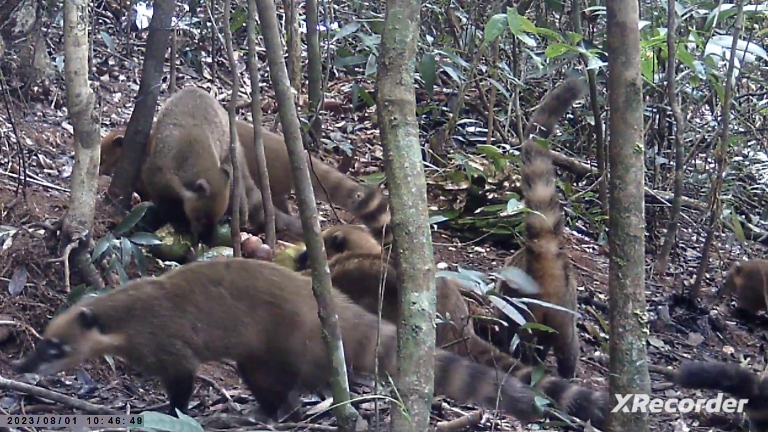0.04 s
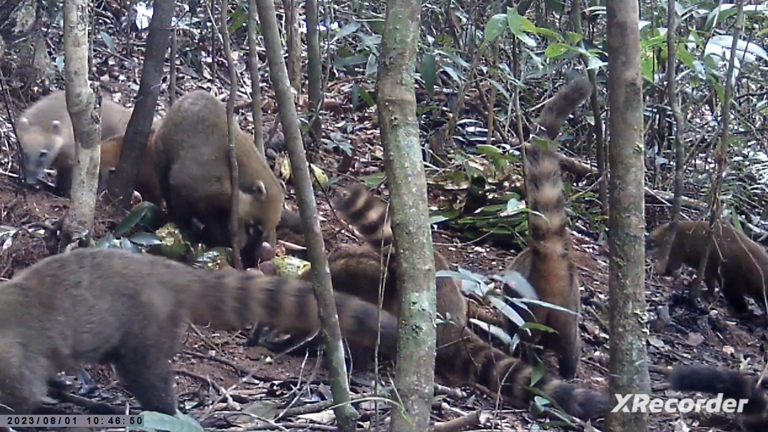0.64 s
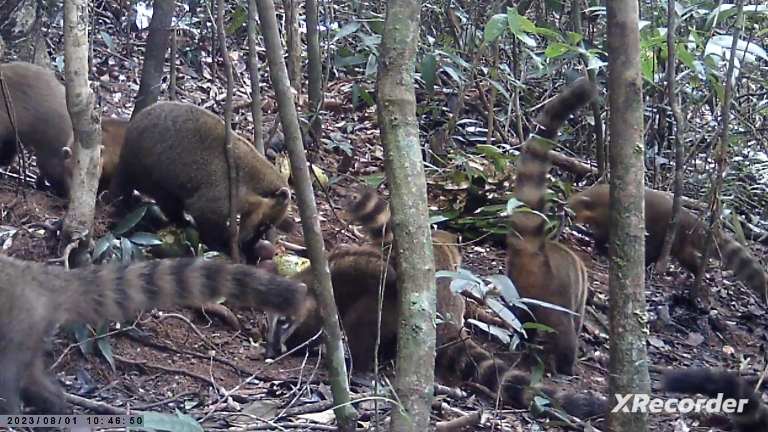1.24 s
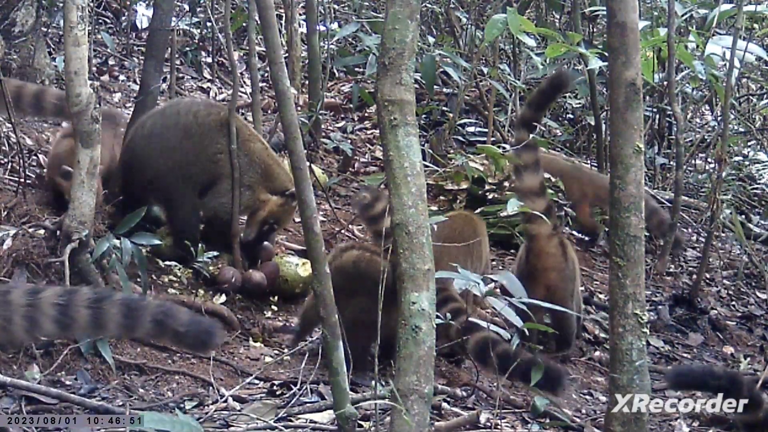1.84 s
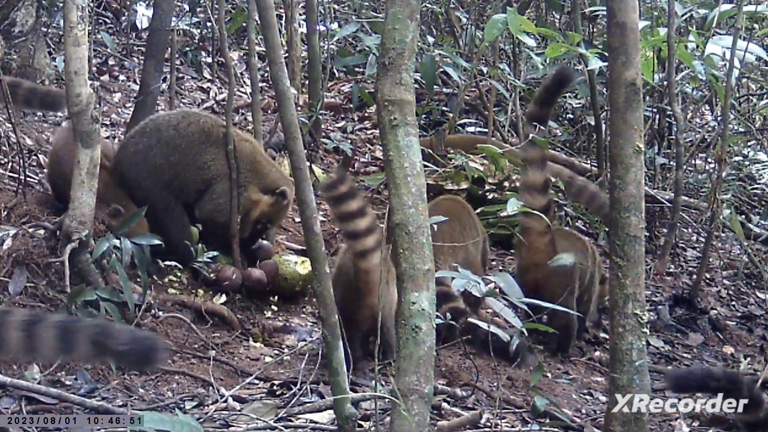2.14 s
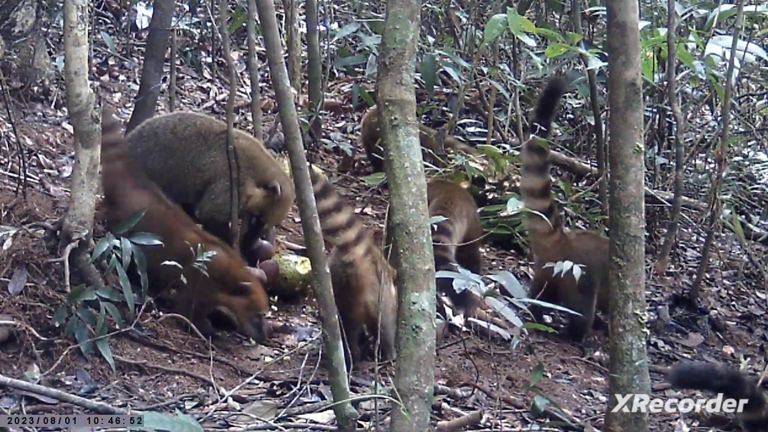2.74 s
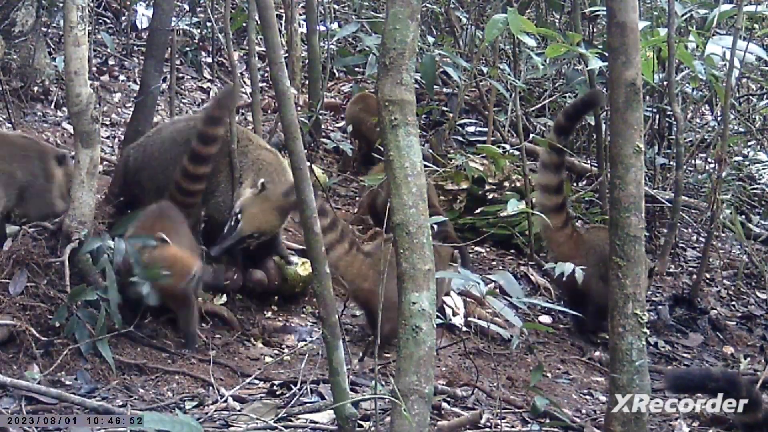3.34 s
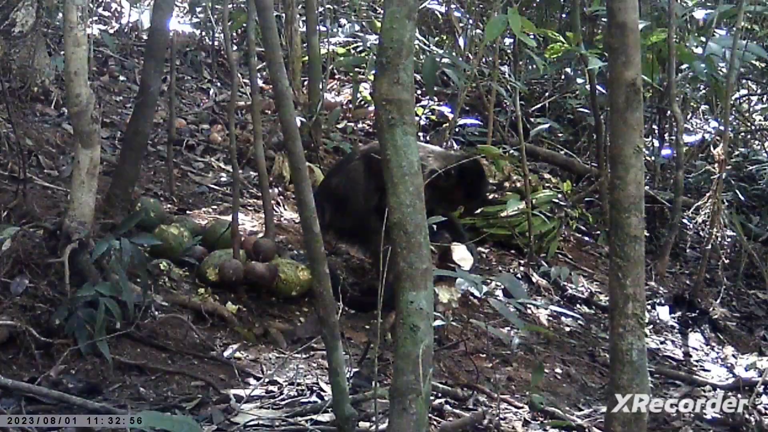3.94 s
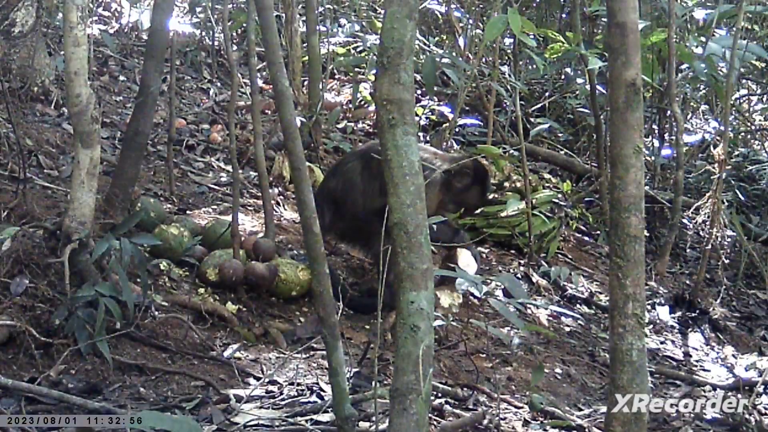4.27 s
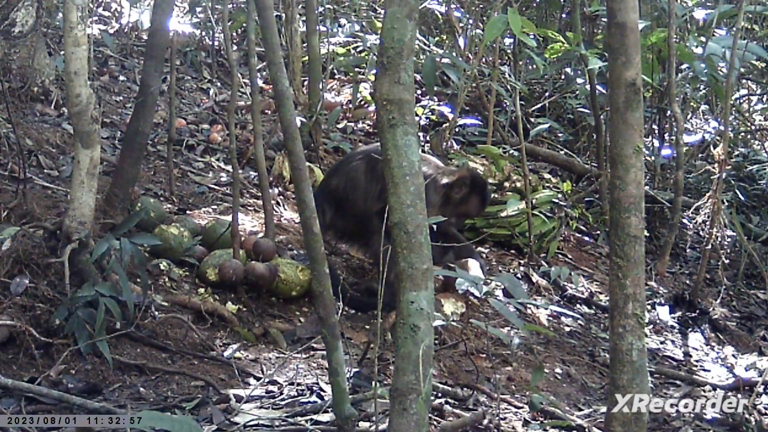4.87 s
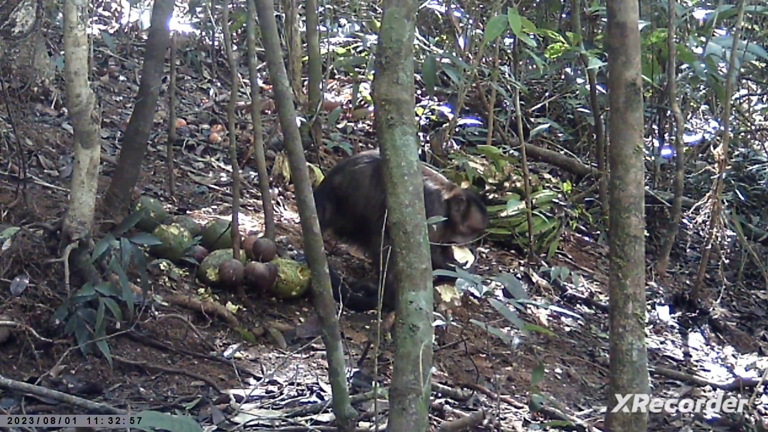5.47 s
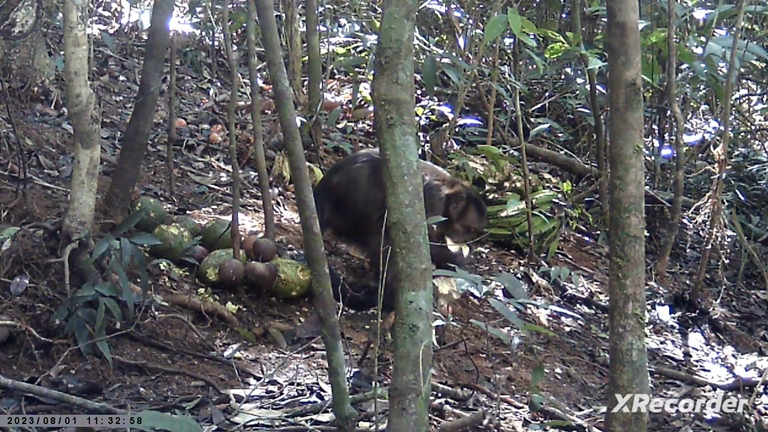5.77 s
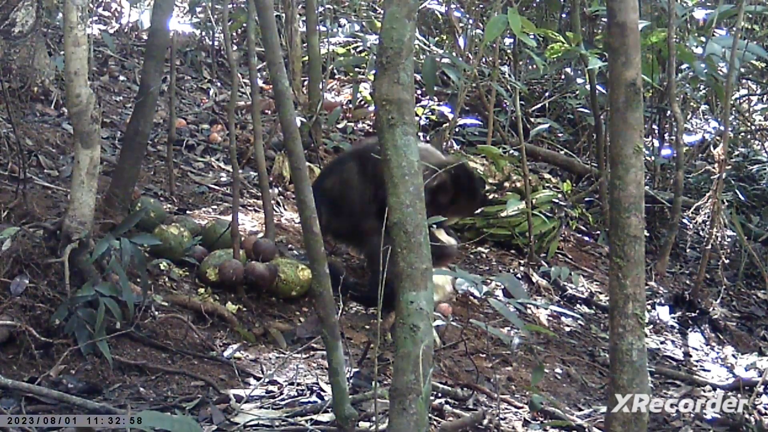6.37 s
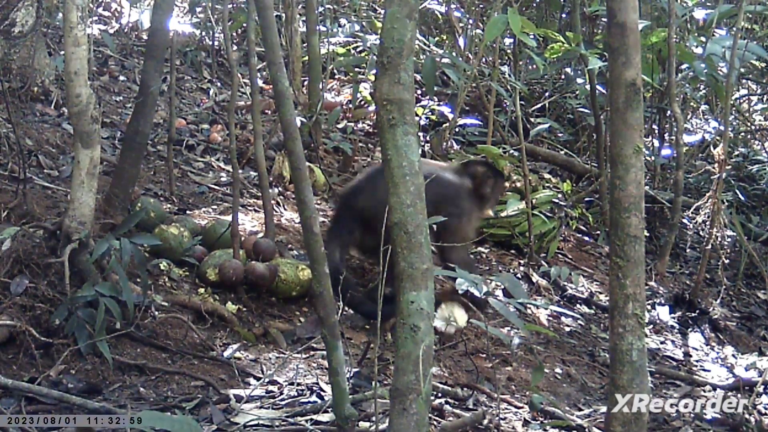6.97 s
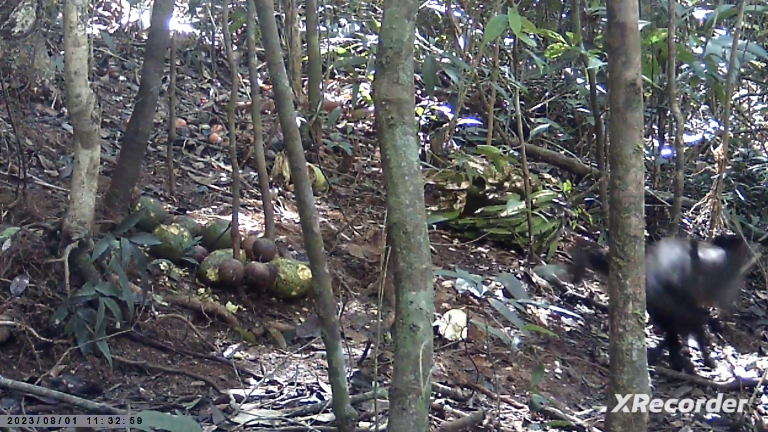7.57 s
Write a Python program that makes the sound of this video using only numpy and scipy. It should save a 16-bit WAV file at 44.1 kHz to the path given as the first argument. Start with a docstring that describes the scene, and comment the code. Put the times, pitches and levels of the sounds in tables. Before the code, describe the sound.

Close, high animal chirps and a wavering squeal amid leaf rustle, then a short gap and quiet biting and tearing of fruit rind.

```python
"""Two sharp chirps, a thin peep and a long wavering squeal sound over rustling dry leaves: coatis squabble over
fallen fruit and crack its rind. After a short silence a monkey tears at a husk, and two faint whistles sound.
The calls are tones from slightly unsteady vocal folds. Leaves, twigs and husk break in tiny bursts of noise.
Tree trunks scatter it all back, over a soft hiss and rumble."""
import sys
import numpy as np
from scipy import signal
from scipy.fft import rfft, irfft
from scipy.io import wavfile
from scipy.ndimage import uniform_filter1d

SR = 44100
rng = np.random.default_rng(int(sys.argv[2]) if len(sys.argv) > 2 else 0)


def transcribe(u):
    """Save the signal u as a 16-bit wav file named by the first command-line argument.

    u: samples, shape (n,) or (channels, n), limited to [-1, 1]; the rate is SR.
    q: integer samples, one column per channel.
    """
    v = np.clip(np.atleast_2d(u).T, -1, 1)
    q = np.round(v * 32767).astype(np.int16)
    wavfile.write(sys.argv[1], SR, q)


N = 340011
TIME = np.arange(N) / SR
SILENCE_START_S, SILENCE_END_S = 3.248, 3.976
TREBLE_LIMIT_HZ = 11050

# Coati chirps: t/s, length/s, first f/Hz, top f/Hz, last f/Hz, peak level/dB, loudest point/share of
# length, start level/dB and end level/dB (both relative to the peak), forest tail level/dB
CHIRPS = [(0.0597, .039, 5304, 6320, 4950, -16.5, 0.18, -5, -12, -14.5),
          (0.12, 0.033, 3800, 4020, 3850, -57, 0.37, -5, 0, -13),
          (2.502, 0.044, 3450, 4396, 3850, -26, 0.4, -10, -10.5, -19),
          (2.746, .06, 9100, 9520, 9250, -53, .5, 0, -8, -10)]
# Paws pressing into the leaves: t/s, level/dB, brightness of the first snap/dB per octave
STEPS = [(0.5294, -47.5, 2), (0.5794, -47.5, 4), (0.619, -48, 0), (0.6794, -57, 0), (0.865, -48.5, -2),
         (0.9702, -50.5, -2), (1.0148, -49, -5), (1.108, -50.5, -3), (1.3236, -47.5, -3), (1.5155, -45, 1),
         (1.62, -54, 3), (1.737, -48, -2), (2.0038, -45.5, 1), (2.0836, -47, 2), (2.1494, -49, 0),
         (2.2004, -46.5, 0), (2.442, -45, -1)]
# Tone colour of dry leaves: f/Hz, level/dB
LEAF_COLOUR = [(100, 0.5), (400, -8.5), (1500, -5), (2500, -5), (4500, 0.5), (6500, 0), (8000, -10),
               (11000, -15)]


def squeal(weak_hz=6562, width_hz=85.7, dip_db=-10.5):
    """A long coati call that thins each time it glides through one weak pitch."""
    # The squeal's four swells: t/s, f/Hz, level/dB
    swells = [(2.887, 4480, -30), (2.899, 6230, -18), (2.911, 6800, -14), (2.922, 6660, -17.5),
              (2.943, 6150, -18), (2.970, 7070, -12.5), (2.984, 7160, -11.5), (3.008, 6260, -19.5),
              (3.043, 6000, -17), (3.059, 6260, -25), (3.083, 6080, -12), (3.097, 5150, -19),
              (3.104, 3900, -35)]
    times, hz, _ = np.transpose(swells)
    closeness = np.exp(-((np.interp(TIME, times, hz) - weak_hz) / width_hz) ** 2)
    return coati(swells) * amp(dip_db * closeness)


def chirps():
    """Short calls from coatis at different distances, each with its own amount of echo."""
    return sum(forest(coati(arch(*shape)), near_db=-10.5, far_db=tail_db, near_s=.13, far_s=.44)
               for *shape, tail_db in CHIRPS)


def lingering_chirp(level_db=-3, age_s=0.2, pitch_ratio=0.91):
    """The wood still rings with a slightly lower chirp from just before the start."""
    out = np.zeros(N)
    chirp = coati(arch(*CHIRPS[0][:-1]) * [1, pitch_ratio, 1])
    add(out, 0, forest(chirp, near_db=-10, far_db=-8)[round(age_s * SR):])
    return amp(level_db) * out


def coati(rows):
    """A coati's voice: a tone plus an overtone at twice the pitch, whose strength the mouth sets; near 7 kHz
    the overtone is almost as loud as the tone."""
    # How strongly the mouth passes the overtone: f/Hz, level/dB
    mouth = [(6000, -17), (7000, -1.5), (7900, -27), (9500, -43)]
    out = np.zeros(N)
    start, pitch, phase, level = vocal_folds(rows, jitter=0.0045, shimmer_db=0.96, flutter_hz=300)
    overtone = amp(level_at(mouth, 2 * pitch)) * np.sin(2 * phase)
    add(out, start, level * (np.sin(phase) + overtone))
    return out


def vocal_folds(rows, jitter, shimmer_db, flutter_hz):
    """The folds vibrate unevenly: jitter shakes the pitch and shimmer shakes the loudness."""
    times, hz, db = np.transpose(rows)
    t = np.arange(times[0], times[-1], 1 / SR)
    pitch = uniform_filter1d(np.interp(t, times, hz), size=200)
    pitch *= 1 + jitter * wobble(len(t), flutter_hz)
    phase = 2 * np.pi * np.cumsum(pitch) / SR
    to_edge_s = np.minimum(t - times[0], times[-1] - t)
    fade = np.sin(np.pi / 2 * np.minimum(to_edge_s / .002, 1)) ** 2
    shaky_db = np.interp(t, times, db) + shimmer_db * wobble(len(t), flutter_hz)
    level = np.sqrt(2) * fade * uniform_filter1d(amp(shaky_db), size=80)
    return times[0], pitch, phase, level


def arch(start, length, first_hz, top_hz, last_hz, db, loudest, start_db, end_db):
    """A short call whose pitch rises, then falls ever faster, as rows of t/s, f/Hz, level/dB."""
    top, drop = .53, .3  # shares of the call: where the pitch peaks, how long the level takes to drop
    progress = np.linspace(0, 1, 41)
    rise = first_hz + (top_hz - first_hz) * np.sin(np.pi / 2 * progress / top) ** 2
    fall = top_hz + (last_hz - top_hz) * abs((progress - top) / (1 - top)) ** 1.5
    level = db + np.interp(progress, [0, loudest, loudest + drop], [start_db, 0, end_db])
    return np.transpose([start + length * progress, np.where(progress < top, rise, fall), level])


def rasp(call, level_db=-17, loud_db=-14, lumps_db=3.5):
    """A low, lumpy rasp rides on the squeal and grows quickly with its strength."""
    # Tone colour of the rasp: f/Hz, level/dB
    rasp_colour = [(20, -4.5), (70, 5), (150, -8), (300, -10), (700, -13), (1350, -35), (3600, -33.5),
                   (5000, -23), (8000, -55)]
    quick_level = np.sqrt(abs(uniform_filter1d(call ** 2, size=500)))
    slow_level = np.sqrt(abs(uniform_filter1d(call ** 2, size=3000)))
    noise = rng.standard_normal(N) * amp(lumps_db * wobble(N, 150))
    lumps = unit(colour(noise, rasp_colour))
    return amp(level_db) * quick_level * np.tanh(slow_level / amp(loud_db)) * lumps


def husk(level_db=1, ring_hz=2010, ring_width_hz=320, ring_db=10.3):
    """Rind tears in dry cracks, first under the coatis' teeth, later under the monkey's; each bite briefly
    rings the hollow fruit."""
    # Rind cracking, by the coatis near 3.1 s and by the monkey after the silence: t/s, level/dB, decay/s,
    # brightness/dB per octave
    cracks = [(3.101, -39, .02, 4.5), (3.118, -40.5, .04, 0.5), (5.8925, -37.5, 0.014, 1.5),
              (5.898, -54.5, 0.085, 18), (6.304, -52, .05, 9), (6.3075, -36.5, 0.02, -3.5),
              (6.3115, -31.5, 0.016, 1.5), (6.319, -44.5, 0.14, 6.5), (7.155, -53.5, 0.027, -2)]
    # Teeth biting in: same columns
    bites = [(6.106, -51.5, 0.018, 1.5), (6.1425, -47, 0.0092, 6), (6.178, -59, .02, 4),
             (6.1865, -42.5, 0.0094, -1.5), (6.193, -48.5, 0.022, 3), (6.2365, -45, .012, 0)]
    # Tone colour of the husk: f/Hz, level/dB
    husk_colour = [(100, -24.5), (1000, -26), (1400, -9), (2100, -3.5), (2900, -7.5), (3600, -9),
                   (4700, -6.5), (5600, -6), (7000, -14), (11000, -28)]
    biting = breaks(bites, husk_colour, grain_db=9, snap=3)
    ring = amp(ring_db) * resonate(biting, ring_hz, ring_width_hz)
    tearing = breaks(cracks, husk_colour, grain_db=4, snap=4.7)
    return amp(level_db) * (tearing + biting + ring)


def forest_floor(step_snap_db=-8.5, step_snap_s=.028):
    """Leaves and twigs snap under paws and snouts, once at each step; four soft low thumps also sound."""
    # Leaves and twigs snapping: t/s, level/dB, decay/s, brightness/dB per octave
    snaps = [(.076, -40.5, 0.05, 4.5), (.546, -50, 0.032, 5), (1.557, -58, 0.027, -3),
             (1.738, -56, 0.026, 0), (2.003, -43, 0.015, 4), (2.054, -53, .015, 12), (2.215, -48, .03, 2.5),
             (2.531, -36.5, 0.052, 2), (6.644, -58, .08, 4), (7.519, -58, 0.067, 8)]
    # Small twigs ticking: same columns
    ticks = [(4.123, -49.5, 0.038, -7), (5.549, -60, .03, -3.5)]
    # Soft low thumps, one under each loud chirp, one before the squeal, one as sound resumes: same columns
    thuds = [(.063, -45.5, 0.16, 7.5), (2.533, -51.5, .08, -0.5), (2.79, -55.5, 0.097, -2),
             (3.979, -48, 0.08, 3.5)]
    # Tone colour of twigs: f/Hz, level/dB
    twig_colour = [(300, -12), (2600, -28), (3400, 2), (4100, -1), (4900, -9), (7000, -19), (11000, -27)]
    # Tone colour of the thumps: f/Hz, level/dB
    thump_colour = [(30, -3), (100, -1), (200, -9.5), (340, -5), (550, -18.5), (1500, -31.5), (6000, -49.5)]
    steps = [(start, db + step_snap_db, step_snap_s, tilt_db) for start, db, tilt_db in STEPS]
    leaves = breaks(snaps, LEAF_COLOUR, grain_db=4, snap=0.92) + breaks(steps, LEAF_COLOUR, grain_db=4.5)
    twigs = breaks(ticks, twig_colour, grain_db=0)
    thumps = breaks(thuds, thump_colour, grain_db=0)
    return leaves + twigs + thumps + shuffle()


def breaks(rows, body_colour, grain_db, snap=0):
    """Dying bursts of noise, as of tearing fibres; grain_db roughens them, snap adds a first click."""
    out, t = np.zeros(N), np.arange(SR // 5) / SR
    for start, db, decay_s, tilt_db in rows:
        fade = die_away(t, decay_s)
        noise = fade * rng.standard_normal(len(t)) * amp(grain_db * wobble(len(t), 900))
        burst = unit(noise) * np.sqrt(np.mean(fade ** 2))
        burst[0] += snap
        add(out, start, amp(db) * colour(burst, body_colour, tilt_db))
    return out


def shuffle(clicks_per_s=1400, spread_db=3, rise_s=0.0046, decay_s=0.34, step_db=-12):
    """Tiny leaf crackles under the coatis' paws swell with each step and end at the silence."""
    # Steady stirring in the leaves: t/s, level/dB
    stirring = [(.3, -63.5), (.8, -70), (1.05, -67), (1.7, -69), (2.2, -67.5), (2.8, -61.5)]
    clicks = (rng.random(N) < clicks_per_s / SR) * rng.choice([-1, 1], N)
    sizes = amp(spread_db * np.minimum(rng.exponential(1, N), 4))
    t = np.arange(SR // 2) / SR
    press = np.minimum(t / rise_s, 1) * die_away(np.maximum(t - rise_s, 0), decay_s)
    power = amp(curve(stirring)) ** 2
    for start, db, _ in STEPS:
        add(power, start, (amp(db + step_db) * press) ** 2)
    return np.sqrt(power) * unit(colour(clicks * sizes, LEAF_COLOUR)) * (TIME < SILENCE_START_S)


def whistles():
    """Faint arched calls made of three harmonics: tones at 1, 2 and 3 times the pitch."""
    # The whistles: columns as in CHIRPS, without the forest tail
    calls = [(4.818, 0.0584, 1090, 1184, 1008, -61, 0.62, -14, -6.5),
             (7.674, 0.042, 1090, 1214, 1100, -60, 0.58, -9, -1)]
    # Harmonics, one row a whistle: first level/dB, second level/dB, third level/dB
    harmonics = [(-5, -10, 1), (-17.5, -3, -3)]
    out = np.zeros(N)
    for call, levels_db in zip(calls, harmonics):
        start, _, phase, level = vocal_folds(arch(*call), jitter=0.0082, shimmer_db=4.5, flutter_hz=150)
        tone = sum(amp(db) * np.sin(k * phase) for k, db in enumerate(levels_db, 1))
        add(out, start, level * tone)
    return out


def trunks(call, lowest_hz=6750):
    """Two slim trunks throw back only the highest pitches of a call."""
    # One echo a trunk: delay/s, level/dB
    echoes = [(.029, -17), (.058, -21)]
    out = np.zeros(N)
    treble = signal.lfilter(*signal.butter(6, lowest_hz, "high", fs=SR), call)
    for delay, db in echoes:
        add(out, delay, amp(db) * treble)
    return out


def forest(x, near_db, far_db, near_s=0.11, far_s=0.61):
    """Ground and near trunks echo for near_s; the wood beyond adds a denser tail lasting far_s."""
    t = np.arange(SR) / SR
    response = 1. * (t == 0)  # the direct sound
    for db, decay_s, gap, first_s in ((near_db, near_s, 70, .008), (far_db, far_s, 20, .02)):
        slots = np.arange(int(first_s * SR), SR - gap, gap)  # one echo in every gap samples
        echoes = np.zeros(SR)
        echoes[slots + rng.integers(0, gap, len(slots))] = rng.choice([-1, 1], len(slots))
        echoes *= die_away(t, decay_s)
        response += amp(db) * echoes / np.linalg.norm(echoes)
    return signal.oaconvolve(x, response)[:N]


def air(hiss_db=-70.5):
    """Forest and microphone hiss over a low rumble on the microphone; both swell briefly."""
    # Tone colour of the hiss: f/Hz, level/dB
    hiss_colour = [(100, -4), (170, -0.5), (300, -4.5), (750, -10), (1300, -12), (2700, -12), (7000, -12.5),
                   (10700, -13), (11300, -28)]
    # Rise of the hiss above hiss_db: t/s, level/dB
    hiss_swell = [(0, 4), (2.8, 4), (3.25, 11), (3.97, 7.5), (4.12, 6.5), (4.2, 2), (6, 3.5), (7.71, 3.5)]
    # Tone colour of the rumble: f/Hz, level/dB
    rumble_colour = [(8, -1), (20, 3.5), (45, -1.5), (80, -5.5), (120, -13), (180, -25.5), (400, -53.5),
                     (2000, -95)]
    # Loudness of the rumble: t/s, level/dB
    rumble_levels = [(0, -56), (1, -59.5), (3.25, -59.5), (3.98, -50.5), (4.12, -50), (4.22, -60.5),
                     (7.71, -59.5)]
    hiss = amp(hiss_db + curve(hiss_swell)) * steady_noise(hiss_colour)
    return hiss + amp(curve(rumble_levels)) * steady_noise(rumble_colour)


def amp(db):
    """Turns decibels into a factor to multiply by."""
    return 10 ** (np.asarray(db) / 20)


def unit(x):
    """Scales a sound to an average strength (rms) of 1."""
    return x / np.sqrt(np.mean(x ** 2) + 1e-20)


def die_away(t, decay_s):
    """A fade that falls by 60 dB in decay_s."""
    return np.exp(-np.log(1000) * t / decay_s)


def curve(rows):
    """Joins rows of t/s, level/dB by straight lines."""
    return np.interp(TIME, *np.transpose(rows))


def level_at(points, hz):
    """Reads the level at hz between rows of f/Hz, level/dB, with octaves evenly spaced."""
    f, db = np.transpose(points)
    return np.interp(np.log(hz + 1), np.log(f + 1), db)


def colour(x, points, tilt_db=0):
    """Gives a sound a tone colour, brightened by tilt_db for each octave above 1000 Hz."""
    hz = np.fft.rfftfreq(2048, 1 / SR)
    octaves = np.log2(np.clip(hz, 1000, TREBLE_LIMIT_HZ) / 1000)
    gain = amp(level_at(points, hz) + tilt_db * octaves - 60 * (hz > TREBLE_LIMIT_HZ + 500))
    log_gain = np.log(np.r_[gain, gain[-2:0:-1]])
    ring = np.fft.ifft(np.exp(signal.hilbert(log_gain).conj())).real  # rings after a click, not before
    return signal.oaconvolve(x, ring / np.linalg.norm(ring))[:len(x)]


def resonate(x, hz, width_hz):
    """Rings at one pitch; a narrower width rings longer."""
    turn = np.exp(2j * np.pi * hz * TIME)
    feedback = np.exp(-np.pi * width_hz / SR)
    return 2 * (turn * signal.lfilter([1 - feedback], [1, -feedback], x / turn)).real


def wobble(n, hz):
    """A smooth random wiggle of strength 1 that swings up to about hz times a second."""
    spectrum = rfft(rng.standard_normal(n + SR))
    f = np.fft.rfftfreq(n + SR, 1 / SR)
    return unit(irfft(spectrum / (1 + (f / hz) ** 4)))[:n]


def steady_noise(points):
    """Noise of strength 1 with the given tone colour."""
    gain = amp(level_at(points, np.fft.rfftfreq(N, 1 / SR)))
    return unit(irfft(rfft(rng.standard_normal(N)) * gain, N))


def add(mix, start_s, sound):
    """Mixes a sound in at the given time."""
    part = mix[max(round(start_s * SR), 0):][:len(sound)]
    part += sound[:len(part)]


def scene():
    """Calls, leaves and husk among the trees; the squeal is nearest and has the faintest echo tail."""
    call = squeal()
    voices = chirps() + lingering_chirp() + rasp(call)
    voices += forest(call, near_db=-11.5, far_db=-24.5, near_s=0.12, far_s=0.65) + trunks(call)
    distant = forest(whistles(), near_db=-10, far_db=-13, far_s=.4)
    ground = forest(forest_floor(), near_db=-11.5, far_db=-18, far_s=0.46)
    feeding = forest(husk(), near_db=-12, far_db=-18.5, near_s=0.1, far_s=0.44)
    return (voices + ground + feeding + distant + air())[None]


def record(dry):
    """The microphone distorts slightly, so loud calls mix with their echoes into low tones."""
    distortion, bass_cut_hz = 0.61, 90
    bent = dry + distortion * signal.lfilter(*signal.butter(1, bass_cut_hz, "high", fs=SR), dry ** 2)
    sounding = (TIME < SILENCE_START_S) | (TIME > SILENCE_END_S)  # dead silence between the two scenes
    gate = uniform_filter1d(1. * sounding, size=40)
    treble_cut = signal.firwin(511, TREBLE_LIMIT_HZ, window=("kaiser", 9), fs=SR)
    return signal.oaconvolve(bent * gate, treble_cut[None], "same")


dry = scene()
out = record(dry)
transcribe(out)
```